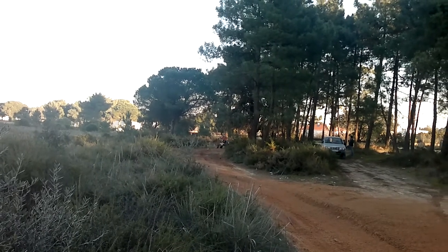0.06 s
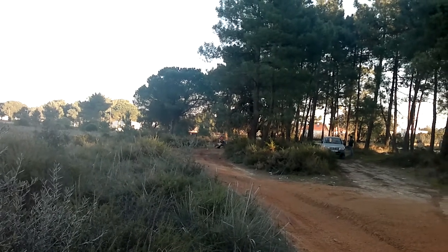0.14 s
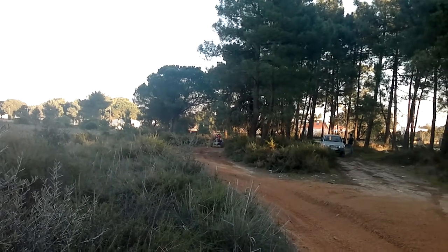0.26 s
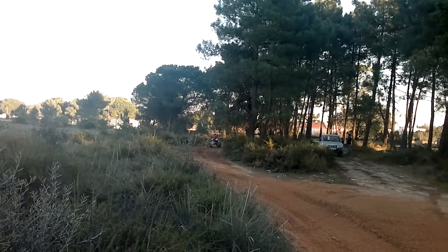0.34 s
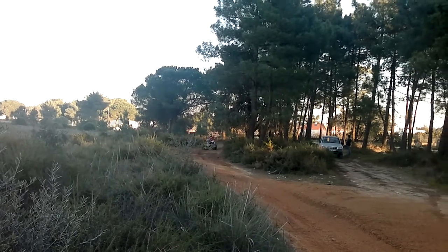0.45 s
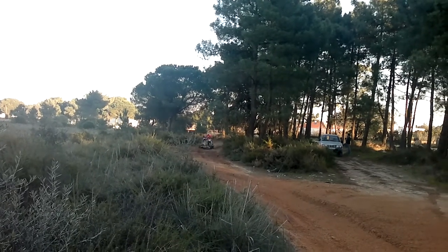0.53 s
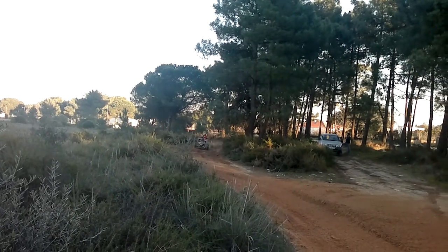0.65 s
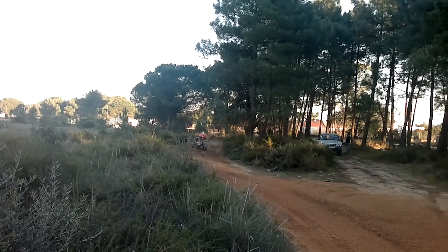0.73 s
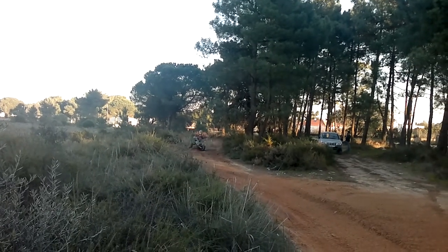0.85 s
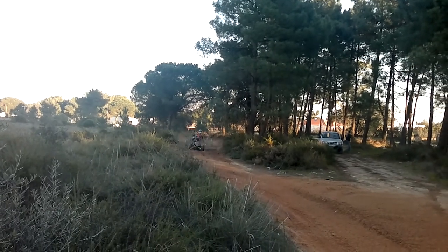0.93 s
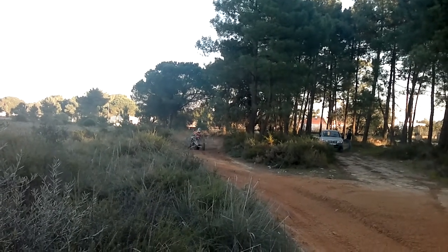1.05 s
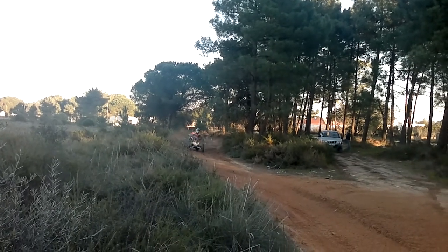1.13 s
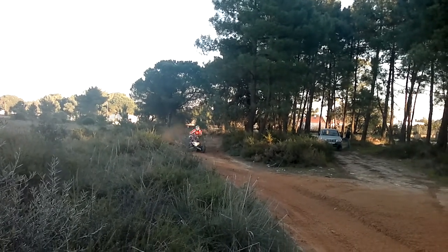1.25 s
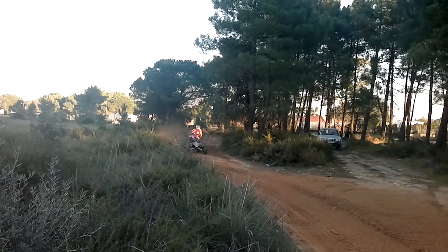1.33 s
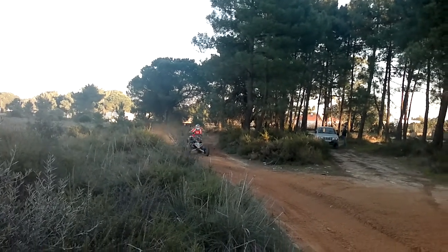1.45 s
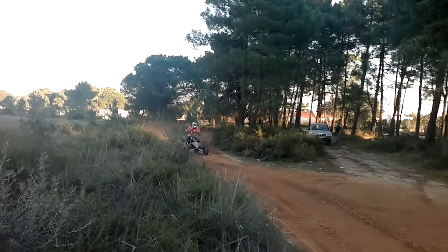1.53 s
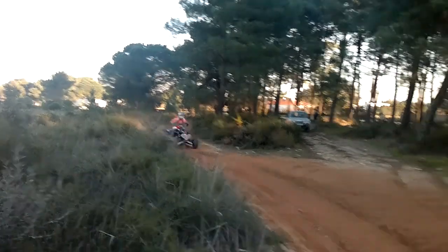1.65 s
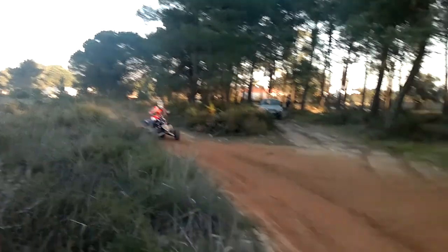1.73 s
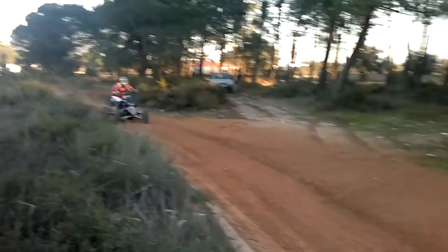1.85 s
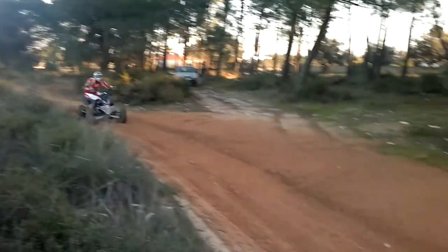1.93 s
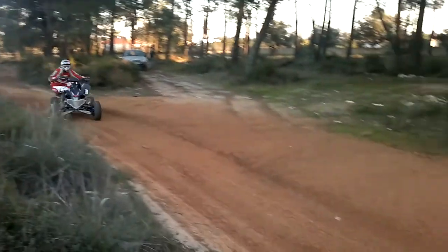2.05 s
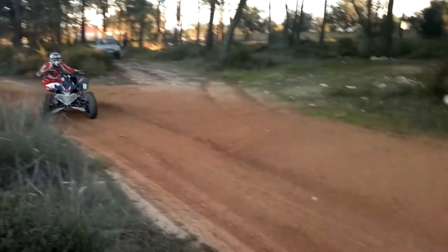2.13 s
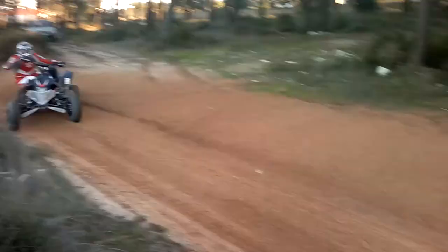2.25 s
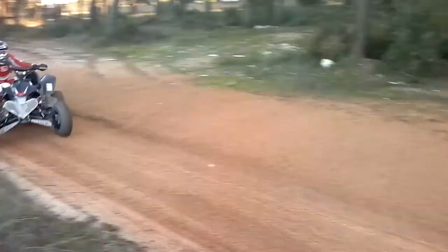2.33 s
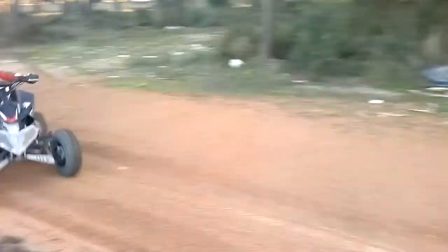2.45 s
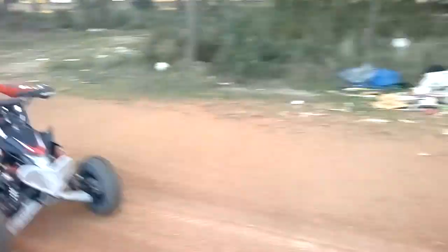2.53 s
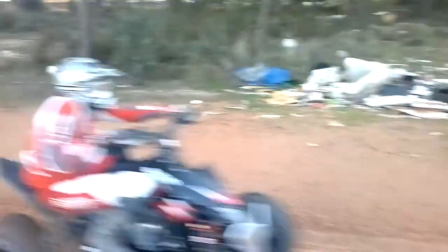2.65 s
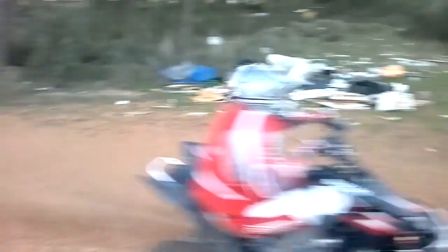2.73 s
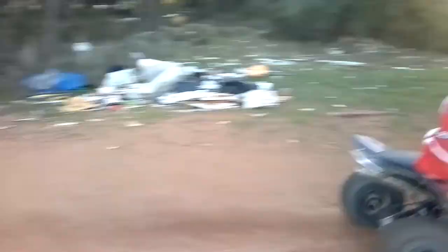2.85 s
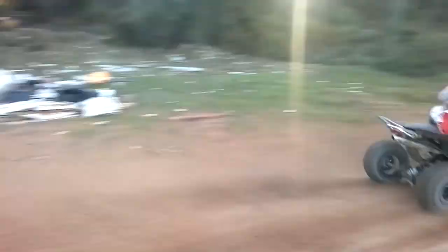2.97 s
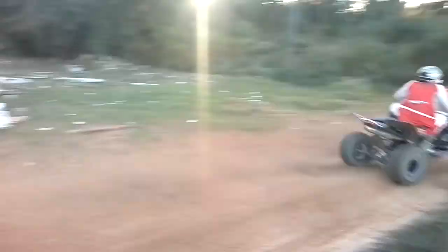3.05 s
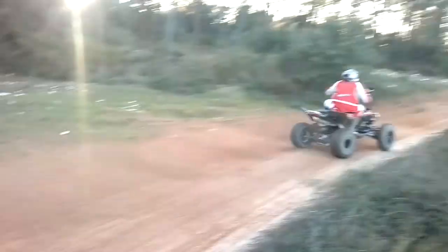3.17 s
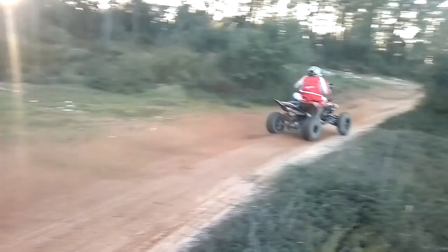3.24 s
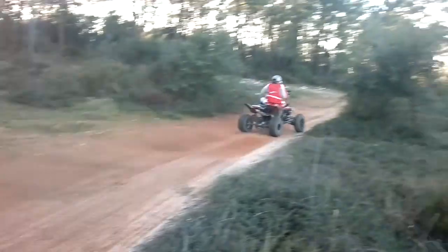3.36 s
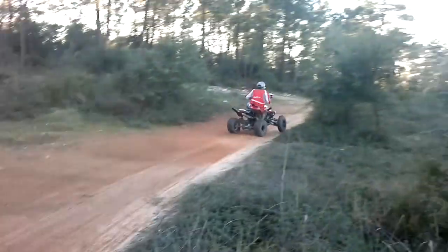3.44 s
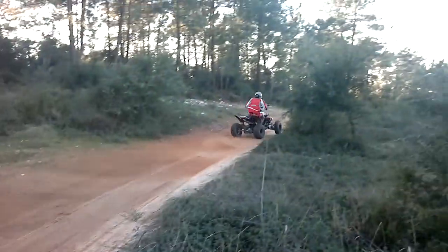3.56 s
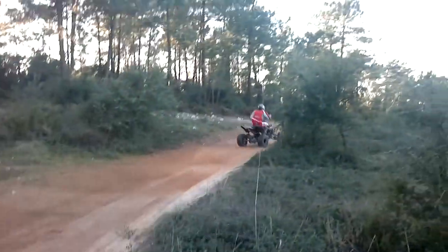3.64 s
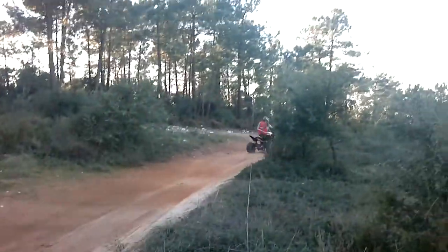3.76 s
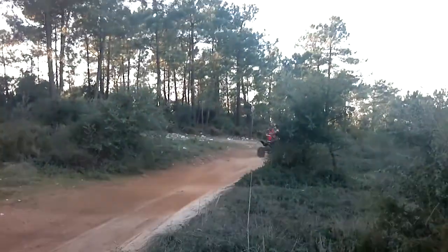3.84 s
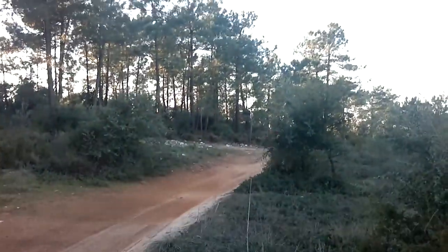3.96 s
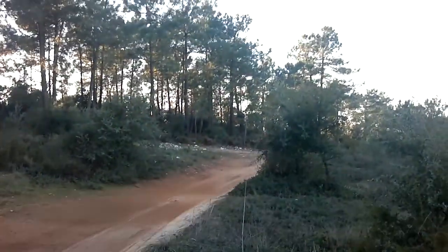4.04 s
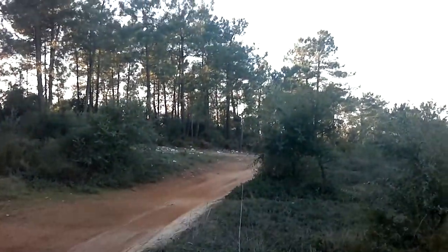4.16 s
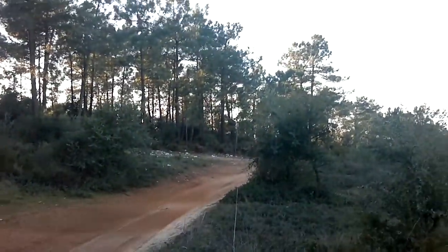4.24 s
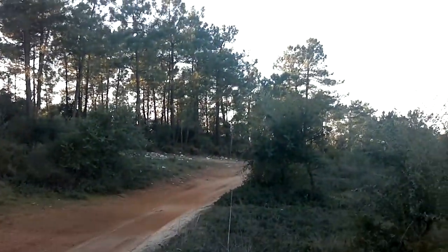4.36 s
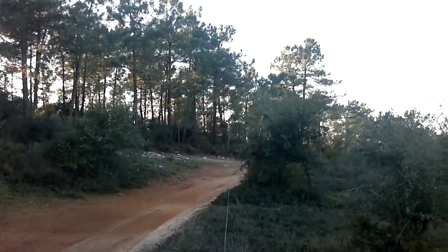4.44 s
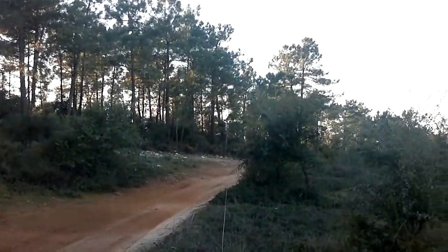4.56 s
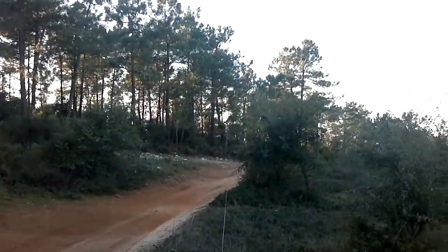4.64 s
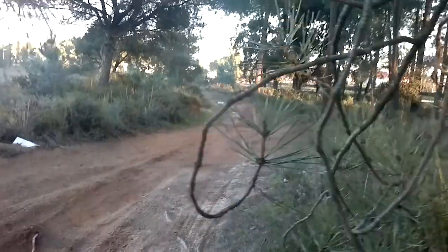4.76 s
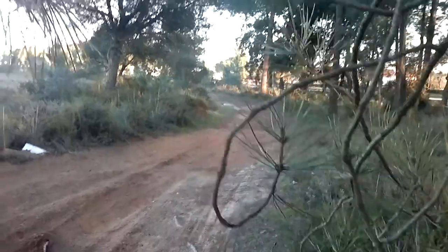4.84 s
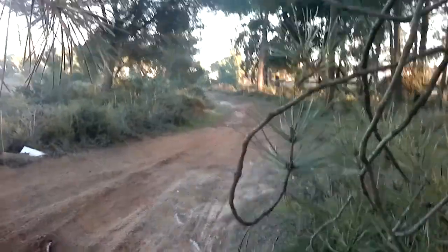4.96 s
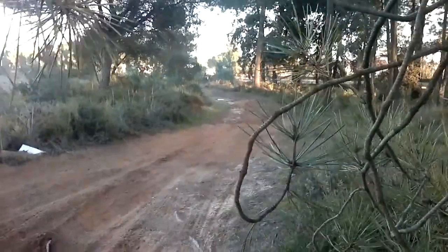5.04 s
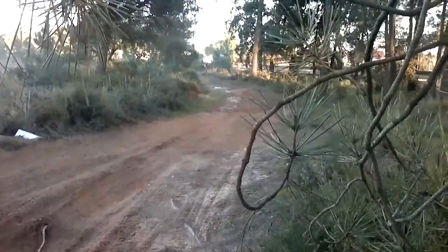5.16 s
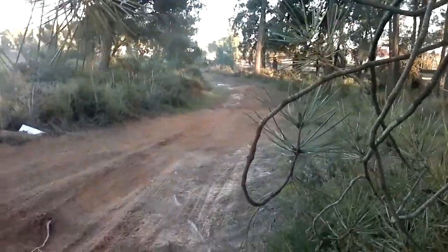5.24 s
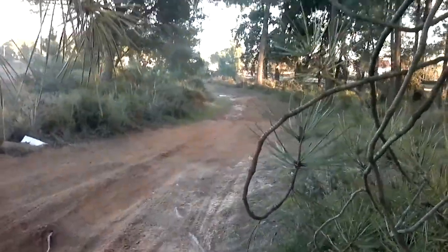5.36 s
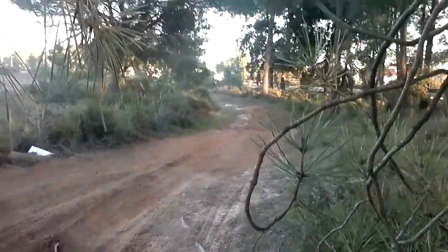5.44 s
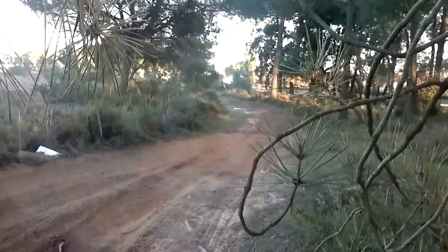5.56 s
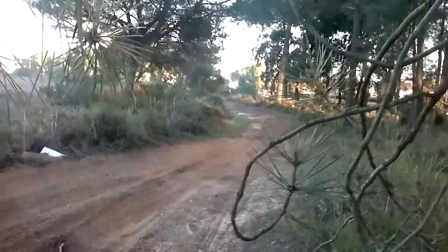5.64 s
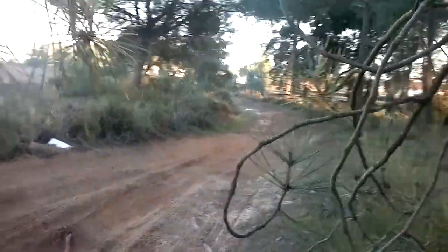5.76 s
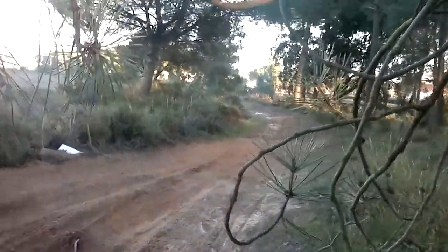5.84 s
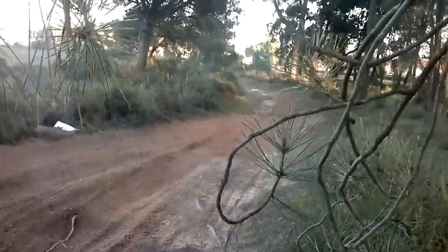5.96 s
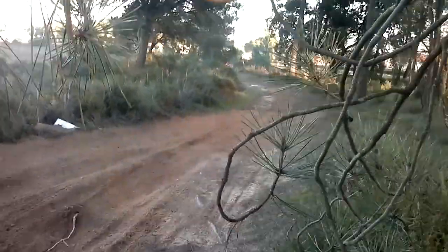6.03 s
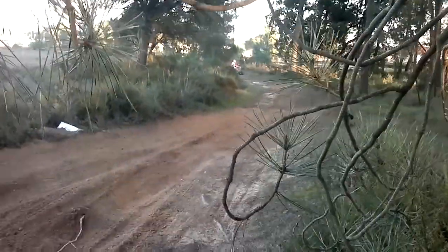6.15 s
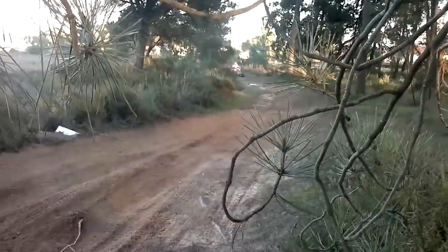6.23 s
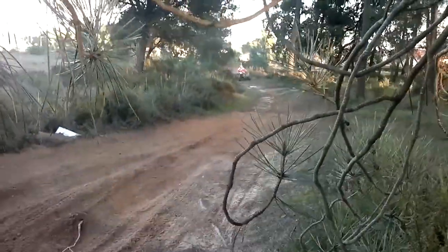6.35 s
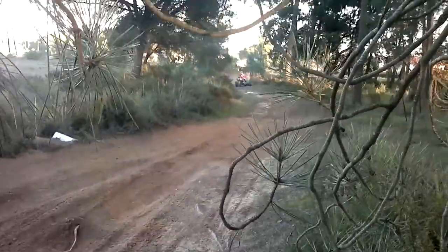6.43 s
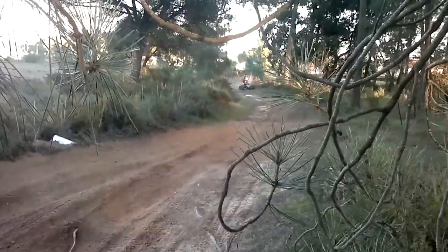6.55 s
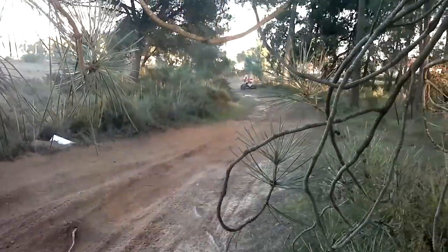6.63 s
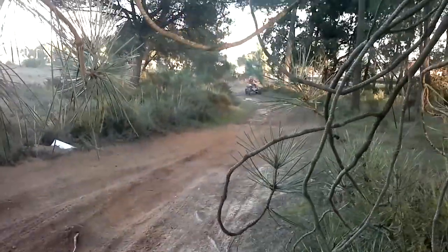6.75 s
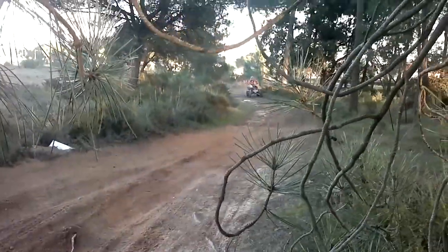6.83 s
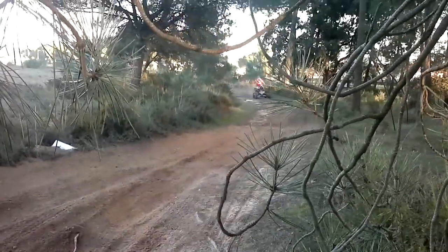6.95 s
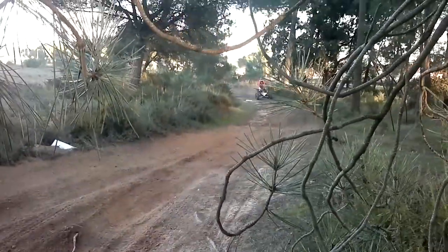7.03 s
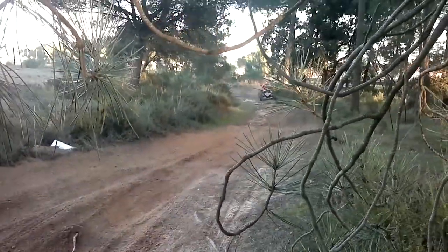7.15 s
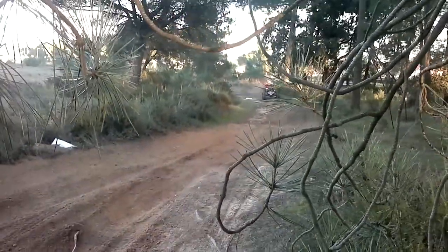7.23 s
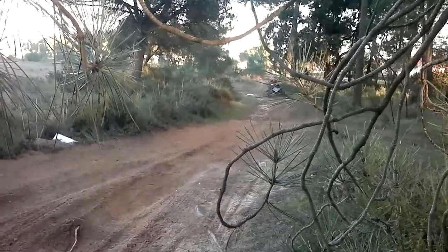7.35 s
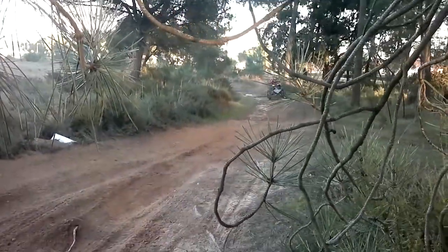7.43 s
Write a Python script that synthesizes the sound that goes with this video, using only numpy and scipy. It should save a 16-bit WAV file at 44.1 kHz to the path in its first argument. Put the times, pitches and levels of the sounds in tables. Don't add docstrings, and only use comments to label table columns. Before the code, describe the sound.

Outdoors on a dirt track, a single-cylinder quad approaches with a buzzing rasp over low throb, its revs flaring as the wheels slip. Around three seconds it passes at arm's length, harsh cracks overloading the stereo microphones, then leaves with sharp tailpipe pulses and a lower pitch. After a short silence the engine is heard again, farther off behind trees, bassy and muffled, lifting, shifting and revving, with a few handling clicks on the left.

```python
import sys
import numpy as np
from scipy import signal
from scipy.fft import rfft, irfft, next_fast_len
from scipy.io import wavfile
from scipy.ndimage import uniform_filter1d

SR = 44100
rng = np.random.default_rng(int(sys.argv[2]) if len(sys.argv) > 2 else 0)


def field_ratio(decibels):
    return 10 ** (np.asarray(decibels, dtype=float) / 20)


def dump_mix(stems):
    frames = np.atleast_2d(stems).T
    limited = np.clip(frames, -1, 1)
    pcm = np.round(limited * 32767).astype(np.int16)
    wavfile.write(sys.argv[1], SR, pcm)


N = 330309
TIME = np.arange(N) / SR

# time [s], firings per second [1/s].
SPEED_PASS = [(0, 69.5), (.05, 75), (.16, 61), (.29, 52), (.44, 68), (.58, 67.6), (.68, 77.4), (1.08, 71),
              (1.27, 71.6), (1.57, 73.3), (1.9, 68.7), (2.57, 72.8), (2.79, 72.6), (3.12, 68), (3.8, 72.9),
              (3.95, 73.6), (4.1, 53.2), (4.74, 51.4)]
SPEED_BACK = [(4.93, 76.4), (5.19, 76.42), (5.41, 56.95), (5.51, 59.55), (5.62, 56.58), (5.83, 63.56),
              (5.95, 62.57), (6.11, 56.12), (6.36, 48.86), (6.58, 49.88), (6.7, 62.25), (6.82, 49.76),
              (6.89, 54.3), (7.1, 78.15), (7.135, 79.6), (7.195, 67.3), (7.26, 67.27), (7.32, 58.7),
              (7.39, 66.04), (7.45, 58.6), (7.49, 59.3)]
# peak [s], extra firings [1/s], rise [s], fall [s].
SLIPS = [
    (.51, 8, 0.068, 0.072),
    (1.179, 11.9, 0.091, 0.086),
    (1.41, 6.1, .14, .16),
    (1.629, 4.16, 0.065, 0.31),
    (2.21, 8.5, .3, 0.32),
    (2.21, 4.1, 0.075, 0.058),
]
FIRINGS_S = [1.059, 1.269, 1.481, 1.705, 1.914, 2.094, 2.296, 2.593, 2.771, 2.893, 3.14, 3.304, 3.424,
             3.541, 3.703, 3.857, 3.942, 4.108, 4.201, 4.313, 4.515, 4.606, 4.692, 6.645, 6.681, 6.9, 7.047,
             7.292, 7.347]
# start [s], end [s], throb change [dB], effort change [dB],
# how fully it coasts [0-1].
LIFTS = [
    (0.163, 0.356, -1.5, -1.5, 1),
    (3.956, 4.095, -5, -3.5, 0.7),
    (5.281, 5.726, 0, -2.5, 0.66),
    (6.133, 6.625, 1.1, 1.5, 1.02),
    (6.792, 6.881, -3, -5, 1),
    (7.223, 7.271, -9, 0, 0.79),
]

VIEW_ENDS_S = [0, 1.8, 2.78, 3.97, 4.85, 5.72, 7.5]
# frequency [Hz], level [dB per Hz].
RASP_NEAR = [(250, -27.5), (420, 1), (641, 4), (745, -19), (921, -7.5), (1190, -7), (1450, -5.5),
             (2050, -9), (2810, -5), (3640, -10), (10200, -47), (12500, -65.5), (15500, -68)]
RASP_CLOSE = [(250, -49), (420, -0.5), (651, 3), (768, -7), (1140, 2.5), (1470, -7), (1680, -2), (1960, -4),
              (3530, 0), (11300, -45), (12700, -58), (14400, -84), (15500, -93)]
RASP_ABREAST = [(190, -49), (320, -3.5), (347, 0), (521, -5.5), (633, -5.5), (890, -15), (1290, -9),
                (2170, -9), (2640, -4), (4030, -13), (4510, -14), (15500, -54.5)]
RASP_AWAY = [(190, -26.5), (320, -3), (465, -14.5), (721, -6), (834, -9.5), (919, -18.5), (1360, 2),
             (1620, -12.5), (1910, -11), (2210, -21.5), (2730, -14), (3900, -26), (6040, -37), (11400, -66),
             (15500, -80.5)]
RASP_HIDDEN = [(190, -36), (330, -42), (381, -21), (420, -25), (535, -5.5), (649, -12.5), (955, -8.5),
               (1410, -7.5), (1650, -15), (1880, -1), (2590, -1.5), (5530, -10), (12000, -55), (15500, -63)]
RASP_FAR = [(190, -42), (330, -3), (381, -24), (455, -14), (840, -15.5), (1040, -4.5), (1710, -6.5),
            (2470, -20.5), (3580, -14.5), (4410, -22.5), (5440, -27.5), (14100, -70), (15500, -76)]
# frequency [Hz], left minus right [dB].
PORTS_NEAR = [(60, -11), (120, 15), (240, 9), (480, 0.5), (950, -2.5), (1890, 0), (3770, 17), (7520, 5),
              (15000, -28)]
PORTS_FAR = [(60, 2.5), (150, 3), (380, 0.5), (950, -1), (2380, 1), (5980, 17.5), (15000, -26)]
VIEWS = [(RASP_NEAR, PORTS_NEAR), (RASP_CLOSE, PORTS_NEAR), (RASP_ABREAST, PORTS_NEAR),
         (RASP_AWAY, PORTS_NEAR), (RASP_HIDDEN, PORTS_FAR), (RASP_FAR, PORTS_FAR)]
# frequency [Hz], left-right correlation [0-1].
SAME = [(60, 0.76), (180, 0.89), (550, 0.97), (1650, 0.92), (4970, 0.29), (15000, 0.018)]

# time [s], level [dB].
EFFORT_PASS = [(0.0, -25.5), (0.08, -23), (0.3, -29), (0.51, -23), (1.41, -23.5), (1.88, -20), (2.53, -21),
               (2.88, -13), (3.2, -14.5), (3.56, -17.5), (3.87, -25), (3.94, -25.5), (3.96, -34.5),
               (4.08, -43), (4.11, -24), (4.2, -28.5), (4.72, -25), (4.73, -41)]
EFFORT_BACK = [(4.95, -26.5), (5.1, -26), (5.54, -33.5), (5.95, -32), (6.14, -37.5), (6.59, -44.5),
               (6.66, -32.5), (7.14, -22.5), (7.49, -22)]
EFFORT_REF_DB = -22
FOLLOWS = (0.961, 1.069, 1.26, 1.45)
# growl, bark, crack, fizz [dB].
VIEW_MIX = [(-33, -24.5, -24, -31.5), (-32, -25.5, -24.5, -29.5), (-28, -24, -23.5, -32),
            (-25.5, -22, -21.5, -34), (-29, -18, -22.5, -30.5), (-24.5, -23.5, -25.5, -32.5)]
CRISP = [(.35, 2.3, 1, .8), (.45, 1.8, 1.2, 1.1), (1, 1.04, 1.04, .95), (1.07, 1.07, 1, .6),
         (.4, 1.6, .3, .3), (.55, 1.7, .4, .25)]
# time [s], share of the rasp packed in the blast [0-1].
FACING = [(0, .26), (.95, .22), (1.15, .33), (2.1, .42), (2.35, .3), (2.52, .3), (2.62, .42), (2.8, .65),
          (3.3, .93), (3.5, .95), (3.95, .93), (3.97, .3), (4.09, .4), (4.105, .92), (4.73, .88),
          (4.94, .4), (5.9, .5), (6.6, .3), (6.64, .65), (7.05, .6), (7.1, .3), (7.26, .3), (7.29, .6),
          (7.37, .55), (7.49, .3)]
REPEATS = [1.3, 1.5, .95, 1.04, 1.2, 1.1]
BLAST_SIDE_MS, BLAST_FACING_MS = 9.6, 1
CHURN_PER_WRAP = 0.066

# start [s], end [s], first frequency [Hz], last frequency [Hz], gain [dB].
ECHOES = [(2.02, 2.7, 3060, 2200, 3.5), (2.2, 3.4, 1800, 1800, -7.5), (1.9, 2.94, 2550, 2400, -9.5),
          (2.4, 2.7, 770, 750, 5), (3.5, 4.03, 1700, 1900, 5), (5.2, 5.1, 7000, 2700, 0.5),
          (3.2, 4.57, 1820, 2600, 7.5), (4.55, 4.85, 490, 510, 4.5), (4.72, 5.03, 810, 990, 4.5),
          (5.4, 5.66, 2100, 1700, 7.5), (5.7, 6.12, 850, 970, 6.5), (6.62, 6.9, 810, 780, 6),
          (7.3, 7.43, 1350, 2240, 3), (7.12, 8.7, 910, 990, -6), (3.8, 7.4, 360, 350, -17.5),
          (7.3, 6.78, 700, 610, 7), (3.85, 4.21, 1100, 630, -12), (3.2, 4.5, 4800, 4500, -2.5),
          (6.4, 7.15, 1030, 990, 4.5), (3.35, 3.97, 11000, 8100, -6), (2.8, 3.3, 1600, 1400, -4),
          (3.8, 3.85, 750, 700, 6), (7, 7.45, 7400, 11400, 4), (2.34, 2.76, 3250, 3000, -4.5),
          (4.9, 5.36, 1300, 1450, 3.5), (6.55, 7.0, 1600, 1850, -6), (3.4, 3.7, 1900, 2000, 2.5)]
# start [s], end [s], first frequency [Hz], last frequency [Hz], gain [dB].
GLINTS_AND_DIPS = [(0, .26, 1450, 1400, 4), (.3, 1.76, 780, 740, -6), (.3, 2.46, 2050, 2050, -5),
                              (.4, 1.06, 1130, 1100, -6), (1, 2.06, 1250, 1050, 3), (1.85, 2.03, 3250, 3250, 4),
                              (.5, 1.21, 3300, 3000, 3), (2.2, 2.67, 1030, 900, 5), (2.2, 2.81, 1140, 1100, -10),
                              (2.15, 2.46, 830, 800, -5), (2.55, 2.73, 1050, 780, 5), (2.66, 2.81, 1300, 1200, 3),
                              (2.45, 2.81, 560, 560, -6), (3.28, 3.41, 2800, 2700, 5), (3.4, 3.59, 3100, 3300, 6),
                              (3.52, 3.71, 3950, 3900, 9), (3.68, 3.75, 2700, 2700, 7), (3.75, 3.94, 4150, 4000, 10),
                              (3.78, 3.98, 2700, 2600, 9), (3.62, 3.99, 2230, 2230, -8), (3.66, 3.98, 1850, 1850, 7),
                              (3.64, 3.87, 950, 950, -7), (3.8, 3.98, 1350, 1350, 4), (3.95, 4.13, 1900, 1900, 7),
                              (4.08, 4.76, 2680, 2720, 5), (4.08, 4.71, 3250, 3250, -7), (4.1, 4.76, 2200, 2150, -5),
                              (4.08, 4.21, 4300, 4300, 5), (4.93, 5.26, 960, 950, 7), (5, 5.31, 1180, 1200, -5),
                              (5.15, 5.51, 1420, 1450, 5), (5.72, 5.99, 860, 1000, 4), (5.78, 6.11, 680, 650, 5),
                              (6.86, 7.12, 1000, 1120, 7), (7.08, 7.27, 1350, 1450, 3), (7.27, 7.39, 1300, 1750, 6),
                              (6.65, 6.81, 1080, 1080, -3), (2.12, 2.36, 1600, 1800, 8), (7.15, 7.32, 3100, 3300, 6),
                              (6.8, 7.05, 1400, 1450, -7),
                              (.9, 2.3, 430, 434, -3), (1.75, 2.2, 560, 530, -10), (2.08, 1.98, 1600, 1600, 10),
                   (2.2, 2.36, 1300, 1350, -4), (3.8, 4.1, 490, 470, -15), (4, 4.71, 700, 690, 5),
                   (4.698, 4.726, 1300, 1250, 4), (4.66, 3.5, 3600, 3500, 7), (5.645, 5.685, 1950, 2100, 11.5),
                   (5.6, 5.8, 8200, 7000, 11), (5.9, 6.18, 7800, 7400, 4), (5.7, 6, 440, 460, -15),
                   (6.1, 7.15, 450, 470, -9), (7.28, 6.2, 1500, 1900, 5), (7.34, 7.3, 3400, 3510, 7),
                   (7.05, 7.7, 5200, 4700, -0.5), (-0.5, 0.53, 640, 620, -4.5), (4.5, 4.1, 1880, 1880, 5)]
ECHO_WIDTH, GLINT_WIDTH = 0.34, 0.13

# time [s], level [dB].
THROB_PASS = [(0.0, -18), (0.04, -22), (0.32, -22.5), (0.39, -18.5), (1.8, -18), (2.16, -15), (2.69, -16.5),
              (2.79, -21.5), (2.83, -27), (3.54, -21), (3.7, -24), (3.74, -22.5), (4.02, -26.5),
              (4.27, -23), (4.69, -22.5), (4.73, -35)]
THROB_BACK = [(4.95, -10), (5.22, -14), (5.42, -23.5), (5.51, -20), (6.07, -21.5), (6.17, -17), (6.74, -18),
              (6.9, -16.5), (7.13, -11.5), (7.22, -11), (7.31, -13.5), (7.35, -12.5), (7.39, -11),
              (7.49, -18)]
# frequency [Hz], gain [dB].
PIPE_NOSE = [(55, 1.5), (75, -10), (110, 2.5), (145, 1), (175, -1.5), (220, -12), (295, -12.5), (440, -32)]
PIPE_BEND = [(72, -8.5), (150, 9), (225, -0.5), (300, 3), (370, -13), (450, -20)]
PIPE_CLOSE = [(72, -9.5), (145, 1), (218, -13), (290, -4.5), (365, -10), (440, -21)]
PIPE_ABREAST = [(70, -6), (140, -0.5), (210, -1), (280, -2.5), (350, -7), (420, -8.5)]
PIPE_AWAY = [(55, -1.5), (110, 3.5), (165, 3), (220, 5), (275, -2.5), (330, -4)]
PIPE_HIDDEN = [(58, 0.5), (76, -9), (116, 1), (152, -1.5), (175, -4), (228, -35), (300, -36), (380, -52)]
PIPE_BUSH = [(50, -5), (63, 4.5), (100, -4), (125, 6), (155, 3), (190, -6), (250, -16.5), (310, -27.5)]
PIPE_OPEN = [(52, -1.5), (78, -11), (105, 4), (150, 2), (185, -5), (215, -9.5), (255, -2.5), (300, -4.5),
             (390, -27.5)]
PIPES = [PIPE_NOSE, PIPE_BEND, PIPE_CLOSE, PIPE_ABREAST, PIPE_AWAY, PIPE_HIDDEN, PIPE_BUSH, PIPE_OPEN]
PIPE_STARTS_S = [2.05, 2.52, 2.78, 3.97, 4.85, 5.74, 6.63]
# frequency [Hz], gain [dB].
COASTING = [(55, -8), (110, -2.5), (140, -4), (170, 9.5), (210, 8.5), (300, -2)]
TRAILING = [(.15, .1), (.08, .1), (0, 0), (0, 0), (.25, .12), (.02, .15)]
# frequency [Hz], level [dB per Hz].
RUMBLE = [(11, -59.5), (18, -38.5), (40, -13), (70, -5), (102, -11.5), (145, 2.5), (194, -8.5),
          (406, -19.5), (500, -36), (650, -57.5), (1100, -120)]
RUMBLE_DB = [-12, -15, -6, -9.5, -13, -11]

# port [0 left, 1 right], start [s], end [s],
# full wraps per blast at first and at last [count].
OVERFLOW = [
    (0, 2.765, 3.67, 17, 2),
    (1, 2.795, 3.61, 12.5, 4),
    (0, 3.696, 3.722, 4, 1),
    (0, 3.732, 3.81, 4, 3),
]
# frequency [Hz], level [dB per Hz].
WOODS = [(240, -39.5), (400, -21), (433, -15.5), (576, -6), (1910, -12.5), (2120, -15.5), (3960, -13),
         (9000, -47.5), (11700, -88), (19800, -120)]
WOODS_DB = -40
WOODS_FOLLOW = 0.33
# time [s], peak [dB], left minus right [dB].
TICKS = [
    (4.125, -28, 17.5),
    (5.138, -19, 33),
    (5.3812, -30.5, 15),
    (5.64, -23, 23),
    (5.848, -14.5, 31),
    (6.209, -37, 20),
    (6.374, -38, 20),
    (6.469, -38, 18),
]
# time [s], gain [dB].
CUT = [(4.72, 4), (4.736, 5), (4.74, -10), (4.77, -58), (4.78, -120), (4.928, -120), (4.931, -17.5),
       (4.951, 0.5)]


def speed():
    flares = sum(np.interp(TIME, [s - rise, s, s + fall], [0, extra, 0]) for s, extra, rise, fall in SLIPS)
    return columns(SPEED_PASS + SPEED_BACK)[0] + flares


def crank(rate):
    wobble = evened(uniform_filter1d(rng.standard_normal(N), size=700))
    turns = np.cumsum(rate * (1 + .005 * wobble)) / SR
    s = np.array(FIRINGS_S)
    slip = np.unwrap(np.interp(s, TIME, turns) % 1, period=1)
    return turns + 1 - np.interp(TIME, s, slip)


def shut(start, end):
    return np.interp(TIME, [start - .015, start + .015, end - .015, end + .015], [0, 1, 1, 0])


def rasp(turns, rate, levels_db, uneven):
    packed, blast_ms, repeat = blast_shape()
    packed, repeat = np.clip(packed, 0, 1), np.clip(repeat, 0, 1)
    since_s = (turns % 1) / rate
    blast = np.exp(-since_s * 1000 / blast_ms) * (1 - np.exp(-since_s / 0.00045)) * field_ratio(1.2 * uneven)
    blast = blast / np.sqrt(abs(uniform_filter1d(blast ** 2, size=3000)) + 1e-9)
    noise = pair_of_noise()
    fired = np.diff(np.floor(turns), prepend=0) > 0
    cracks = -np.sqrt(SR / rate) * fired * field_ratio(1.4 * uneven)
    cracks = np.array([cracks, np.roll(cracks, shift=7)])
    spread = scattered(cracks)
    hz, out = np.fft.rfftfreq(2048, 1 / SR), np.zeros((2, N))
    under = [1 / (1 + (hz / edge_hz) ** 8) for edge_hz in (800, 2000, 4300)]
    weights = np.diff([0 * hz, *under, 0 * hz + 1], axis=0)
    for db, weight, coherent, crisp in zip(levels_db, weights, (1, 1, .85, .15), np.transpose(CRISP)):
        crispness = by_view(crisp)
        tight = np.clip(packed * crispness, 0, 1)
        puffs = noise * np.sqrt(tight * blast ** 2 + 1 - tight)
        share = np.clip(repeat * coherent * (packed if coherent < 1 else crispness), 0, 1)
        steps = tight * cracks + np.sqrt(1 - tight ** 2) * spread
        drive = np.sqrt(1 - share) * puffs + np.sqrt(share) * steps
        out += through_views(drive, hz, weight, db)
    return out


def blast_shape():
    packed = columns(FACING)[0]
    calm = 1 - CHURN_PER_WRAP * wraps_per_blast()[0]
    repeat = packed * by_view(REPEATS) * calm
    return packed, BLAST_SIDE_MS + (BLAST_FACING_MS - BLAST_SIDE_MS) * packed ** 2, repeat


def scattered(cracks):
    t = np.arange(700) / SR
    cluster = rng.standard_normal((2, len(t))) * (rng.random(len(t)) < .06) * np.exp(-t / .006)
    cluster = cluster[0] + 0.38 * cluster
    cluster = cluster / np.linalg.norm(cluster, axis=1, keepdims=True)
    return signal.oaconvolve(cracks, cluster, axes=1)[:, :N]


def through_views(drive, hz, weight, db):
    out, ends = np.zeros((2, N)), np.searchsorted(TIME, VIEW_ENDS_S)
    for (spectrum, ports), start, end in zip(VIEWS, ends, ends[1:]):
        gain_db = read(spectrum, hz) + 10 * np.log10(abs(weight) + 1e-12)
        gain_db = gain_db - 10 * np.log10(np.mean(field_ratio(gain_db) ** 2))
        for side, sign in enumerate((.5, -.5)):
            ring = colour(drive[side, start:end], gain_db + sign * read(ports, hz))
            span = slice(start, start + len(ring))
            out[side, span] += field_ratio(db[span]) * ring[:N - start]
    return out


def bands_db():
    lifts_db = sum(db * shut(start, end) for start, end, _, db, _ in LIFTS)
    effort_db = columns(EFFORT_PASS + EFFORT_BACK)[0] - EFFORT_REF_DB + lifts_db
    return [by_view(db) + follows * effort_db for db, follows in zip(np.transpose(VIEW_MIX), FOLLOWS)]


def echoes(x, paths, width):
    out = x.copy()
    for start, end, first_hz, last_hz, db in paths:
        part = out[:, round(start * SR):round(end * SR)]
        along = np.arange(part.shape[1]) / (SR * (end - start))
        turn = np.exp(2j * np.pi * np.cumsum(first_hz + (last_hz - first_hz) * along) / SR)
        r = np.exp(-np.pi * width * first_hz / SR)
        band = 2 * (turn * signal.lfilter([1 - r], [1, -r], part / turn)).real
        part += (field_ratio(db) - 1) * np.sqrt(abs(np.sin(np.pi * along))) * band
    return out


def throb(turns, levels_db, uneven):
    behind = [-.05, .31, .38, .53, .66, .68]
    first, spreading = (by_view(v) for v in np.transpose(TRAILING))
    tones = 0
    for k, (db, turn) in enumerate(zip(levels_db, behind)):
        lag = np.where(spreading > 0, (k + 1) * (first + spreading * k), turn)
        tones = tones + field_ratio(db) * np.sqrt(2) * np.cos(2 * np.pi * ((k + 1) * turns - lag))
    tones = tones * field_ratio(0.64 * uniform_filter1d(uneven, size=300))
    level = np.sqrt(abs(uniform_filter1d(tones ** 2, size=4000)))
    rumble = field_ratio(by_view(RUMBLE_DB)) * level * pair_of_noise(RUMBLE)
    return tones * field_ratio(np.array([[.7], [-.7]])) + rumble


def orders_db(rate):
    coasting = sum(share * shut(start, end) for start, end, *_, share in LIFTS)
    legs = np.split(rate, np.searchsorted(TIME, PIPE_STARTS_S))
    loaded_db = [np.concatenate([read(pipe, k * leg) for pipe, leg in zip(PIPES, legs)])
                 for k in range(1, 7)]
    unloaded_db = coasting * read(COASTING, np.arange(1, 7)[:, None] * rate)
    shares_db = uniform_filter1d(loaded_db, size=2500, axis=1) + unloaded_db
    lifts_db = sum(db * shut(start, end) for start, end, db, *_ in LIFTS)
    level_db = columns(THROB_PASS + THROB_BACK)[0] + lifts_db
    return level_db + shares_db - 10 * np.log10((field_ratio(shares_db) ** 2).sum(axis=0))


def overflow(turns):
    cycle = np.floor(turns).astype(int)
    size = rng.random(size=(600, 2))[cycle].T
    most = wraps_per_blast()
    wraps = most * (.15 + .85 * size) * (np.diff(cycle, prepend=0) > 0)
    rebound = np.diff(np.floor(turns + .55), prepend=0) > 0
    wraps = wraps + np.maximum(most - 8.5, 0) * size[::-1] * rebound
    wraps = wraps * (wraps > .8)
    t_ms = np.arange(SR // 25) * 1000 / SR
    pace = (np.exp(-(t_ms / 2.8) ** 2) + .4 * np.exp(-t_ms / 6.5)) * (1 - np.exp(-t_ms / .3))
    turned = np.cumsum(signal.oaconvolve(wraps, pace[None] / pace.sum(), axes=1)[:, :N], axis=1)
    unsettled = np.exp(-(t_ms / 15) ** 3) * (1 - np.exp(-t_ms / .2))
    swing = np.minimum(1.6 * signal.oaconvolve(1. * (wraps > 0), unsettled[None], axes=1)[:, :N], 1)
    corner = .9
    return 0.5 * swing * np.arcsin(corner * np.sin(2 * np.pi * turned)) / np.arcsin(corner)


def wraps_per_blast():
    out = np.zeros((2, N))
    for port, start, end, first, last in OVERFLOW:
        out[port] += np.interp(TIME, [start, end], [first, last], left=0, right=0)
    return out


def ticks():
    out, t = np.zeros((2, N)), np.arange(SR // 100) / SR
    band = signal.butter(4, [3600, 7000], "band", fs=SR, output="sos")
    top = signal.butter(2, 7000, "high", fs=SR, output="sos")
    for s, db, pan_db in TICKS:
        knock = rng.standard_normal(len(t)) * np.exp(-t / 0.00023)
        click = signal.sosfilt(band, knock) + field_ratio(-31) * signal.sosfilt(top, knock)
        at = round(s * SR)
        out[:, at:at + len(t)] += field_ratio(db - 10.5 + np.array([[.5], [-.5]]) * pan_db) * click / abs(click).max()
    return out


def woods(effort_db):
    smoothed_db = WOODS_FOLLOW * uniform_filter1d(effort_db, size=6000)
    return field_ratio(WOODS_DB + 5 + smoothed_db) * pair_of_noise(WOODS)


def pair_of_noise(spectrum=((1, 0), (2, 0))):
    size = next_fast_len(N, real=True)
    a, b = rfft(rng.standard_normal((2, size)), axis=1)
    hz = np.fft.rfftfreq(size, 1 / SR)
    same = np.clip(read(SAME, hz), 0, 1)
    pair = np.array([a, same * a + np.sqrt(1 - same ** 2) * b]) * field_ratio(read(spectrum, hz))
    return evened(irfft(pair, size, axis=1)[:, :N])


def colour(x, db):
    log_gain = np.log(field_ratio(np.maximum(db, -100)))
    circle = np.concatenate([log_gain, log_gain[-2:0:-1]])
    taps = np.fft.ifft(np.exp(np.conj(signal.hilbert(circle)))).real[:len(db)]
    return signal.oaconvolve(x, taps)[:N]


def evened(x):
    return x / np.sqrt(np.mean(x ** 2) + 1e-20)


def read(points, hz):
    f, value = np.transpose(points)
    return np.interp(np.log(hz + 1), np.log(f + 1), value)


def columns(rows):
    s, *values = np.transpose(rows)
    return [np.interp(TIME, s, v) for v in values]


def by_view(values):
    view = np.searchsorted(VIEW_ENDS_S[1:-1], TIME)
    return uniform_filter1d(np.choose(view, values), size=900)


def scene():
    rate = speed()
    turns = crank(rate)
    uneven = rng.standard_normal(size=600)[np.floor(turns).astype(int)]
    levels_db = bands_db()
    direct = echoes(rasp(turns, rate, levels_db, uneven), ECHOES, ECHO_WIDTH)
    quad = throb(turns, orders_db(rate), uneven) + echoes(direct, GLINTS_AND_DIPS, GLINT_WIDTH)
    return quad + woods(levels_db[1] - EFFORT_REF_DB) + overflow(turns) + ticks()


def top_cut(x):
    return signal.sosfilt(signal.butter(12, 15660, fs=SR, output="sos"), x)


def record(dry):
    cut, knee = dry * field_ratio(columns(CUT)[0]), .8
    over = np.maximum(abs(cut) - knee, 0)
    held = cut - np.sign(cut) * (over - .21 * np.tanh(over / .21))
    band_limit = signal.firwin(63, 14800, window=("kaiser", 8), fs=SR)
    mix = signal.oaconvolve(held, band_limit[None], "same")
    return top_cut(mix)


dry = scene()
out = record(dry)
dump_mix(out)
```